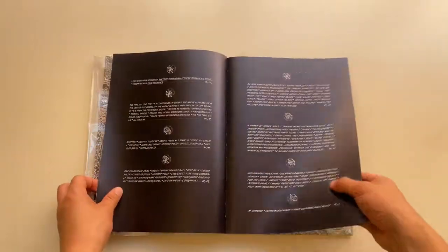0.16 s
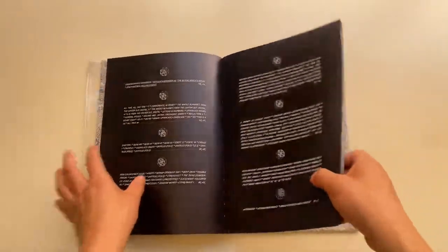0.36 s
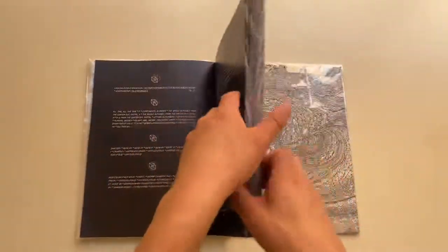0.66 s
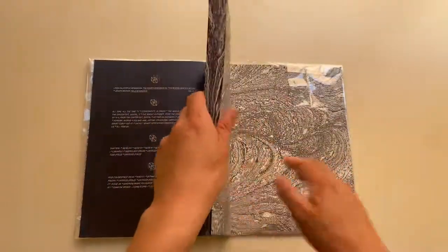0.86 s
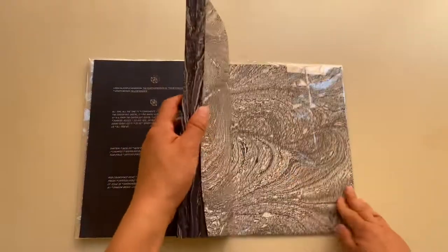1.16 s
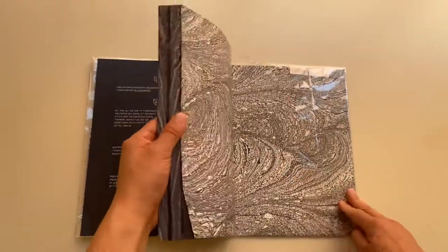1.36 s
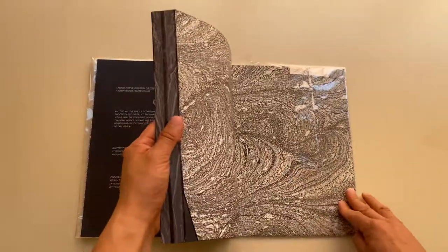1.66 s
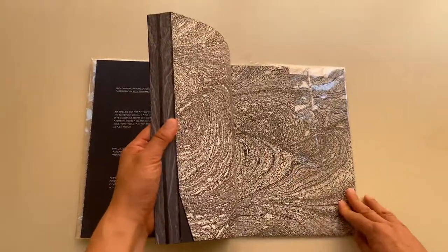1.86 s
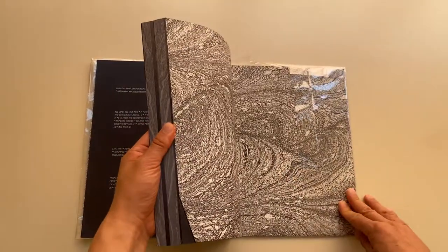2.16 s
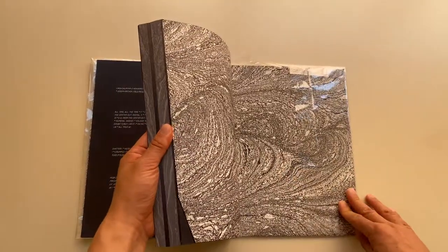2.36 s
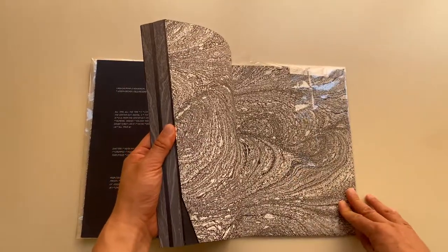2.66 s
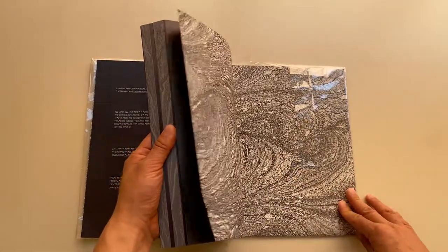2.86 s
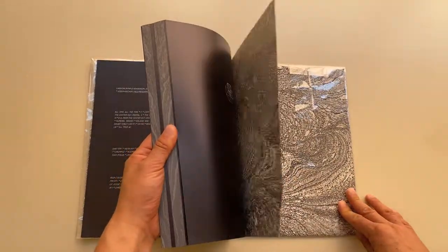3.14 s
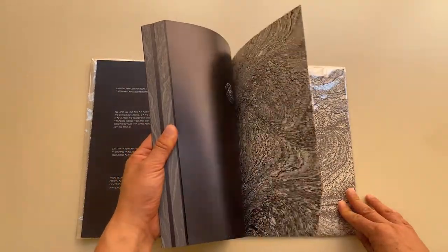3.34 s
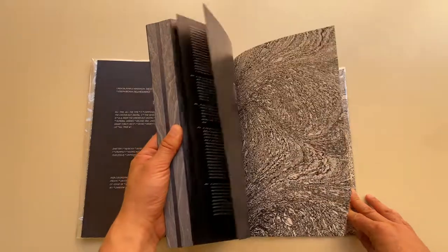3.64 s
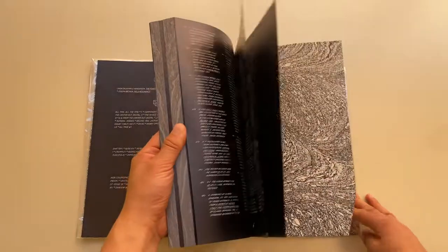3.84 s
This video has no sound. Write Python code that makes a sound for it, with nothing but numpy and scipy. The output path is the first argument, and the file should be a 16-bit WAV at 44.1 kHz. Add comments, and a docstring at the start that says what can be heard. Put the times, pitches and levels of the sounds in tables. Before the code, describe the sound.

Heavy book pages lifted by hand: a sharp crackling rustle with a dull thump, a lighter second snap and brief creak, then near silence with tiny page ticks, close-miked in a quiet indoor room.

```python
"""A thick block of glossy pages scrapes and crackles as hands lift it and hold it upright, close to
a two-port microphone in a quiet room. The scrape is noise broken into tiny cracks.
Single pages snap off the thumb: short noise bursts over a ringing pair of tones.
Low decaying rings give a sway at the start and thumps of the block; a wavering tone is the binding's creak.
Low rumble, a weak hum and a faint hiss, made of coloured noise and sines, lie underneath."""
import sys
import numpy as np
from scipy import signal
from scipy.fft import rfft, irfft
from scipy.io import wavfile
from scipy.ndimage import uniform_filter1d

SR = 44100
rng = np.random.default_rng(int(sys.argv[2]) if len(sys.argv) > 2 else 0)


def wav_record(signal):
    """Record a signal, one row per channel, as 16-bit PCM in the file named by sys.argv[1]."""
    frames = np.transpose(np.atleast_2d(signal))
    bounded = np.clip(frames, -1, 1)
    # unit amplitude maps onto the largest positive 16-bit level
    quanta = np.round(bounded * 32767).astype(np.int16)
    wavfile.write(sys.argv[1], SR, quanta)


def voltage_ratio(level):
    """Linear amplitude factor for a level in decibels (scalar or array-like)."""
    return 10 ** (np.asarray(level, float) / 20)


N = 176400  # samples, 4 s

# How the two ports hear the paper: typical delay and its spread, left over right level, likeness 0-1
PORT_LAG_S, PORT_SPREAD_S, LEFT_DB, PAPER_SAME = 0.00019, 0.00011, 1.5, 0.41
HIGH_HISS_HZ = 8345  # lower edge of the high hiss band


def evened(x):
    """Scales to rms 1."""
    return x / np.sqrt(np.mean(x ** 2) + 1e-20)


def read(points, hz):
    """Reads a table of pitches and values on a log-frequency axis."""
    table_hz, value = np.transpose(points)
    return np.interp(np.log(hz + 1), np.log(table_hz + 1), value)


def coloured(x, points):
    """Filters x by a table of gains over pitch, then scales it to rms 1."""
    length = x.shape[-1]
    gain = voltage_ratio(read(points, np.fft.rfftfreq(length, 1 / SR)))
    return evened(irfft(rfft(x) * gain, length))


def band(x, low_hz, high_hz):
    """Keeps a band of pitches, without ringing ahead of the sound; rms 1."""
    edges_hz = [low_hz, min(high_hz, 20000)]
    sos = signal.butter(N=2, Wn=edges_hz, btype="band", fs=SR, output="sos")
    return evened(signal.sosfilt(sos, x))


def ports(a, b, lag_s, same):
    """Left port hears a; the right hears it later, partly blurred by b."""
    same = np.clip(same, 0, 1)
    hz = np.fft.rfftfreq(len(a), 1 / SR)
    late = irfft(rfft(a) * np.exp(-2j * np.pi * hz * lag_s), len(a))
    right = same * late + np.sqrt(1 - same ** 2) * b
    return np.array([a * voltage_ratio(LEFT_DB / 2), right * voltage_ratio(-LEFT_DB / 2)])


# How alike the room noise is in both ports.
# Each row: pitch in Hz, likeness from 0 (unrelated) to 1 (the same).
ROOM_LIKENESS = [(30, 0.88), (70, .86), (150, 0.64), (300, .42), (600, 0.0499), (6000, 0.012),
                 (15000, 0.27)]


def room_noise(points):
    """Steady noise, much alike in both ports only in the bass."""
    z = rfft(rng.standard_normal((2, N)))
    same = np.clip(read(ROOM_LIKENESS, np.fft.rfftfreq(N, 1 / SR)), -1, 1)
    right = same * z[0] + np.sqrt(1 - same ** 2) * z[1]
    return coloured(irfft(np.array([z[0], right]), N), points)


# Swell of the rumble. Each row: time in seconds, level in dB.
RUMBLE_SWELL = [(0.0, -50.5), (0.56, -58.5), (0.59, -55), (0.93, -63), (1.19, -52.5), (1.22, -63),
                (1.34, -54.5), (1.38, -64.5), (2.35, -63), (2.39, -62.5), (2.87, -63.5), (2.91, -71.5),
                (3.05, -61), (3.42, -67), (3.89, -60.5), (4.0, -61.5)]
# Colour of the rumble. Each row: pitch in Hz, relative strength in dB.
RUMBLE_TONE = [(8.8, -65.5), (15, -25.5), (35, -5), (59, 0), (91, -10.5), (124, -8.5), (146, -12),
               (201, -16.5), (313, -27.5), (500, -34.5), (650, -60.5), (1100, -120)]
# Weak hum. Each row: pitch in Hz, level in dB.
HUM_TONES = [(59.2, -75), (119, -77)]
# Colour of the faint hiss. Each row: pitch in Hz, relative strength in dB.
HISS_TONE = [(120, -31), (200, -4), (294, -12.5), (322, -14), (601, -18.5), (647, -19), (836, -21),
             (3250, -28.5), (5730, -30), (16000, -47.5)]


def room():
    """Swelling low noise as rumble, steady sines as hum and steady noise as hiss."""
    hiss_db = -79
    t = np.arange(N) / SR
    hum = 0
    for hz, db in HUM_TONES:
        hum = hum + voltage_ratio(db) * np.sqrt(2) * np.sin(2 * np.pi * (hz * t + rng.random()))
    rumble = voltage_ratio(np.interp(t, *np.transpose(RUMBLE_SWELL))) * room_noise(RUMBLE_TONE)
    rumble = rumble * voltage_ratio([[-.9], [.9]])  # a little louder on the right
    return rumble + hum + voltage_ratio(hiss_db) * room_noise(HISS_TONE)


def patchy(x):
    """Sheets ring unevenly: random patches of some 350 Hz by 20 ms grow louder or softer."""
    patch_db = 3.0
    z = signal.stft(x, nperseg=256)[2]
    patches = rng.standard_normal(z.shape[:0:-1]).T
    patches = uniform_filter1d(patches, size=2, axis=0)  # over pitch
    patches = evened(uniform_filter1d(patches, size=6, axis=1))  # over time
    return signal.istft(z * voltage_ratio(patch_db * patches), nperseg=256)[1][:, :N]


# Paper in motion. Each row: time in seconds, level of the middle in dB,
# low body in dB relative to the middle, high hiss in dB relative to the middle.
PAPER_MOTION = [(0, -52.5, -10.5, -14), (.19, -62, 0.5, -21), (.222, -44, -5.5, -18),
                (.236, -33, -8.5, -10.5), (0.255, -28, -8.5, -13.5), (.27, -32.5, -2, -18.5),
                (0.299, -37, -4, -20), (.358, -43, -6.5, -22), (.4, -47, -6.5, -14.5),
                (.536, -55, -5.5, -18), (.654, -60, -2.5, -13), (.7, -52, -13, -23), (.76, -64, -2.5, -16),
                (.85, -65, -18, -32), (0.929, -76.5, -18, -29), (1.003, -81.5, 6.5, -14),
                (1.011, -41.5, -27, -23), (1.025, -41, -19.5, -27), (1.069, -52.5, -7.5, -35),
                (1.11, -55.5, -12, -10.5), (1.14, -62, -10, -24), (1.19, -66, -26, -28),
                (1.25, -62.5, -6, -18), (1.31, -68, -14, -24), (1.356, -67.5, -10, -14),
                (1.4, -80.5, -5.5, -21), (1.9, -100, 7, -21), (2.2, -85.5, 8, -16), (2.5, -102, 7, -17),
                (3.75, -100, 7, -18.5), (3.77, -70, 5.5, -15), (3.81, -90, 4, -13.5),
                (3.859, -84.5, -4, 5.5), (3.913, -82, 2, -17.5), (3.93, -66, 1, -27), (4.0, -67, -5, -24)]
# Colour of the middle. Each row: pitch in Hz, relative strength in dB.
PAPER_TONE = [(600, -27.5), (1000, -5.5), (1500, 0), (2300, -0.5), (4520, -3.5), (6720, -9.5),
              (7600, -13.5), (8600, -33.5)]
# Colour of the high hiss band, dull below 9 kHz and above 12.5 kHz; snaps use it in their tails too.
# Each row: pitch in Hz, relative strength in dB.
HIGH_HISS_TONE = [(8300, -32.5), (9500, 0), (11000, 1), (12300, -5.5), (12900, -21.5), (15500, -27.5)]


def rustle():
    """Sliding sheets: smooth scrape plus clumped tiny cracks, following the hand's motion."""
    grains_per_s, grain_spread_db, grain_s, grain_share = 980, 1, .0012, 0.36
    body_low_hz, body_high_hz = 263, 995
    t = np.arange(N) / SR
    size = voltage_ratio(grain_spread_db * np.minimum(rng.exponential(1, N), 5))
    size = size * (rng.random(N) < grains_per_s / SR)
    puffs = signal.lfilter([1], [1, -np.exp(-1 / (grain_s * SR))], size)  # each grain fades away
    loudness = 1 - grain_share + grain_share * evened(puffs)
    drive = loudness * rng.standard_normal((2, N))
    drive = patchy(ports(*drive, PORT_LAG_S, PAPER_SAME))
    body = band(drive, body_low_hz, body_high_hz)
    middle = coloured(drive, PAPER_TONE)
    high_hiss = coloured(drive, HIGH_HISS_TONE)
    s, db, body_db, high_hiss_db = np.transpose(PAPER_MOTION)
    body = voltage_ratio(np.interp(t, s, body_db)) * body
    high_hiss = voltage_ratio(np.interp(t, s, high_hiss_db)) * high_hiss
    return voltage_ratio(np.interp(t, s, db)) * (middle + body + high_hiss)


# Low decaying rings: a 44 Hz sway in the rumble at the start, then thumps of the page block.
# Each row: start in seconds, relative level in dB, pitch in Hz, time to fall by 60 dB in seconds.
LOW_RINGS = [(0, -42, 43.8, 1.3), (.267, -36.5, 344.2, 0.17), (.295, -37, 160, .3), (1.05, -51, 199.6, .25),
             (3.76, -57.5, 175.3, .2)]


def low_ring(db, hz, t60_s):
    """A dull low ring: a sine and a narrow band of noise die away together."""
    t = np.arange(SR // 4) / SR
    flutter = band(ports(*rng.standard_normal((2, len(t))), 0, 0.98), hz * .8, hz * 1.25)
    tone = np.sin(2 * np.pi * (hz * t + rng.random())) * voltage_ratio([[1], [3]])  # left, right dB
    fade = voltage_ratio(db - 5 - 60 * t / t60_s) * (1 - np.exp(-t / 0.0063))  # soft start
    return fade * (tone + .4 * flutter)


# Single page snaps. Each row: start in seconds, relative level in dB, ring pitch in Hz,
# high hiss in relative dB, tail in relative dB.
PAGE_SNAPS = [(0.1112, -45.5, 1250, -8.5, -14.5), (0.159, -55.5, 1080, -22, -4),
              (.178, -46.5, 1240, -30, -16), (0.1971, -43.5, 1160, -7, -15), (0.224, -25, 4280, -1, -28),
              (.2334, -20.5, 5030, -12, -27), (0.2396, -31.5, 1030, -18, -13), (.2540, -17, 4050, -8, -39),
              (.269, -26.5, 650, -25.5, -16), (0.3222, -32, 4000, -22.5, -26),
              (.363, -33.5, 1380, -15, -9.5), (0.367, -36, 5000, 8, -12), (0.6668, -40, 794, 4, -14.5),
              (0.7685, -41, 2490, -17, -32), (0.8588, -44.5, 2300, -15, -32), (0.9561, -65, 1620, -18, -30),
              (1.0038, -45.5, 4300, -11, -15), (1.0112, -38, 1980, -25, -28), (1.0202, -27, 3400, -25, -31),
              (1.084, -53.5, 1250, -26, -18), (1.106, -55, 1250, -3, -14),
              (1.1493, -25.5, 4720, -14.5, -29), (1.1683, -42, 4890, -31, -10.5),
              (1.6455, -59.5, 2260, -12.5, -13), (2.189, -59, 2860, -28, -17.5),
              (2.5501, -63.5, 6000, -7.5, -16.5), (2.6115, -52, 6200, -9, -18),
              (2.6188, -52.5, 2670, -3, -11), (2.7112, -55.5, 6320, -12.5, -22),
              (2.7841, -55.5, 6890, -3, -24), (2.807, -53, 5680, -8, -12.5), (2.8118, -57, 2026, -23, -12),
              (3.475, -58.5, 7060, -4, -22.5), (3.5361, -53, 4500, 5.5, -13.5),
              (3.566, -57, 6450, 3.5, -15), (3.6363, -52, 4790, -5.5, -20), (3.7595, -53, 459, -9, -15.5),
              (3.92, -49, 1073, -7.5, -9), (3.9503, -51, 2660, -11, -29)]


def snap(db, hz, high_hiss_db, tail_db):
    """A crack of a few milliseconds rings the bent sheet; smaller cracks and the room trail after it."""
    crack_t60_s, tail_t60_s, tail_rise_s, tail_hiss_db = .015, .2, 0.0047, -8
    aftercracks_per_s, aftercrack_db = 180, 10
    ring_split, ring_t60_s = .04, .026  # ring time at 1 kHz, shorter with the root of pitch
    crack_top_hz = 12800
    t = np.arange(SR // 4) / SR
    lag_s = PORT_LAG_S + PORT_SPREAD_S * rng.standard_normal()
    noise = ports(*rng.standard_normal((2, len(t))), lag_s, PAPER_SAME)

    crack = voltage_ratio(-60 * t / crack_t60_s) * np.minimum(t / .0008, 1)
    hits = rng.random(len(t)) * (rng.random(len(t)) < aftercracks_per_s / SR)
    aftercracks = np.convolve(hits, crack[:SR // 50])[:len(t)]
    tail = voltage_ratio(tail_db - 60 * t / tail_t60_s) * (1 - np.exp(-t / tail_rise_s))
    tail = tail * (1 + voltage_ratio(aftercrack_db) * aftercracks)

    # two tones, just below and just above the ring pitch
    pair = [np.sin(2 * np.pi * (hz * (1 + side * ring_split) * t + rng.random() / 4)) for side in (-1, 1)]
    ring_fade = voltage_ratio(-60 * t * np.sqrt(hz / 1000) / ring_t60_s) * np.minimum(t / 0.00069, 1)
    ring = ports(sum(pair), pair[0], lag_s / 3, 0.94) * ring_fade

    burst_db = -2.5 - 2.9 * np.log2(hz / 4000)  # weaker for higher snaps
    burst = voltage_ratio(burst_db) * crack * band(noise, hz / 2.2, HIGH_HISS_HZ - 1000)
    trail = tail * band(noise, hz / 2.0, min(hz * 6, HIGH_HISS_HZ - 1200))
    high_hiss = crack * band(noise, HIGH_HISS_HZ, crack_top_hz)
    high_hiss = high_hiss + voltage_ratio(tail_hiss_db) * tail * coloured(noise, HIGH_HISS_TONE)
    return voltage_ratio(db - 4) * (ring + burst + trail + voltage_ratio(high_hiss_db) * high_hiss)


# Overtones of the creak. Each row: multiple of the base pitch, relative strength in dB.
CREAK_OVERTONES = [(1, 5), (2, -3), (3, 10)]


def creak():
    """The binding slips at a nearly even rate for an instant: a fading tone with a wavering pitch."""
    length_s, base_hz, start_db, jitter = 0.037, 214.6, -49, 0.034  # jitter: share of pitch
    t = np.arange(0, length_s, 1 / SR)
    wobble = evened(uniform_filter1d(rng.standard_normal(len(t)), size=200))
    turns = np.cumsum(base_hz * (1 + jitter * wobble)) / SR
    tone = np.zeros((2, len(t)))
    for port, shift in enumerate((0, .09)):  # right port shifted, in turns
        for k, db in CREAK_OVERTONES:
            tone[port] += voltage_ratio(db) * np.sin(2 * np.pi * k * (turns + shift))
    edges = np.minimum(np.minimum(t / 0.005, (length_s - t) / 0.0036), 1)
    return voltage_ratio(start_db - 140 * t) * edges * evened(tone)


def add(mix, s, sound):
    """Mixes a sound in at time s, cut off at the end of the mix."""
    part = mix[:, round(s * SR):][:, :sound.shape[1]]
    part += sound[:, :part.shape[1]]


def scene():
    """Room and rustle throughout, with low rings, snaps and one creak at their times."""
    mix = room() + rustle()
    for s, *row in LOW_RINGS:
        add(mix, s, low_ring(*row))
    for s, *row in PAGE_SNAPS:
        add(mix, s, snap(*row))
    add(mix, 1.232, creak())
    return mix


def top_cut(x):
    """Nothing passes above the cut-off."""
    return signal.sosfilt(signal.butter(12, 16830, fs=SR, output="sos"), x)


def record(dry):
    """Removes the highest treble and returns the finished mix."""
    edge_hz = 16100
    lowpass = signal.firwin(255, edge_hz, fs=SR)
    limited = signal.oaconvolve(dry, lowpass[None], "same")
    return top_cut(limited)


dry = scene()
out = record(dry)
wav_record(out)
```